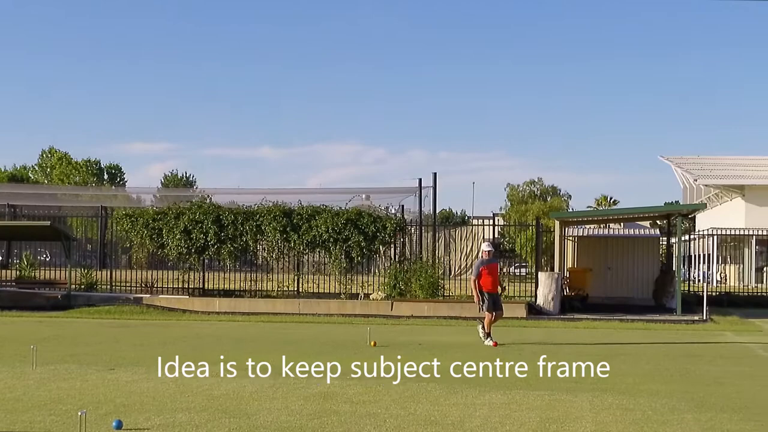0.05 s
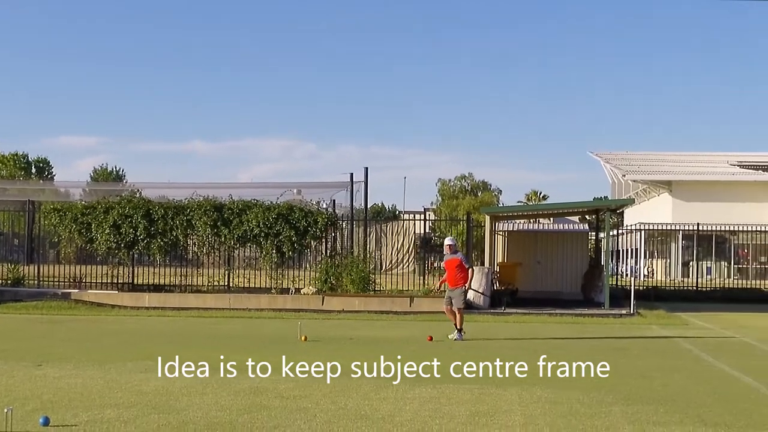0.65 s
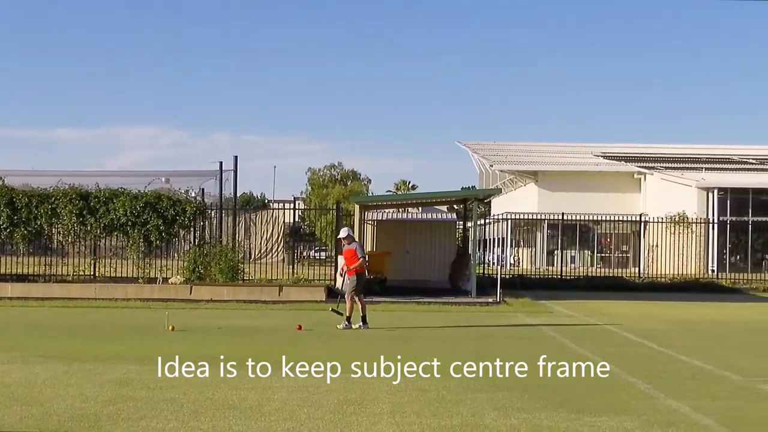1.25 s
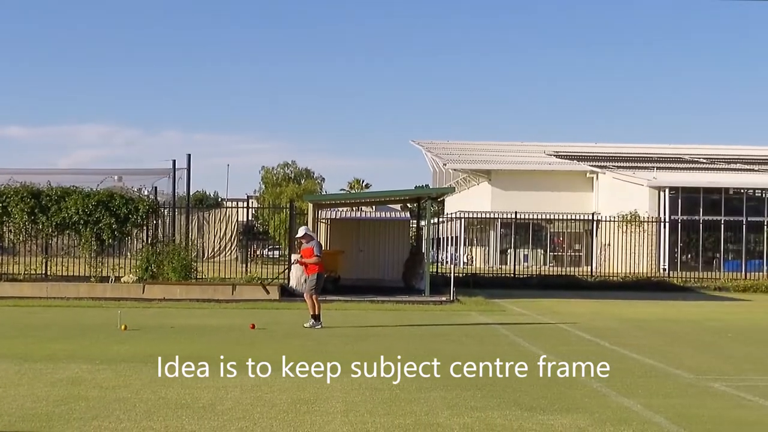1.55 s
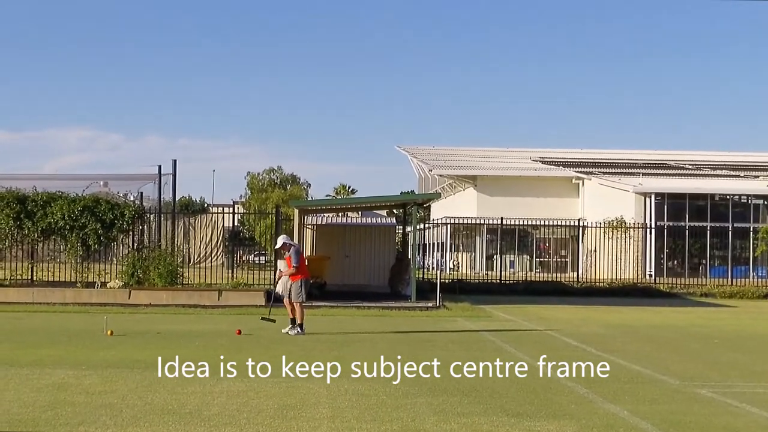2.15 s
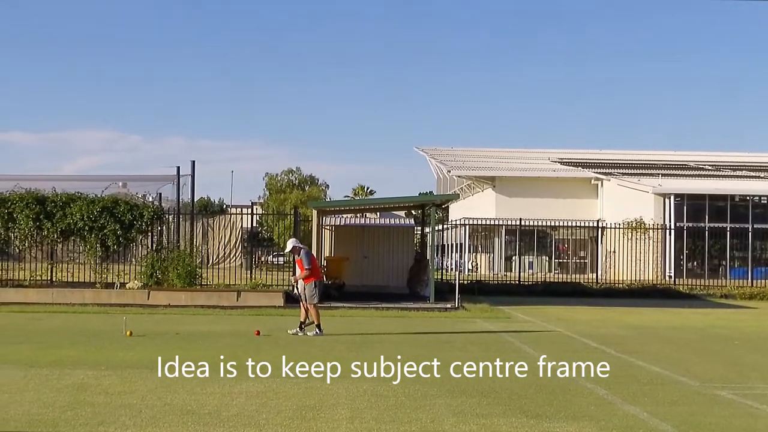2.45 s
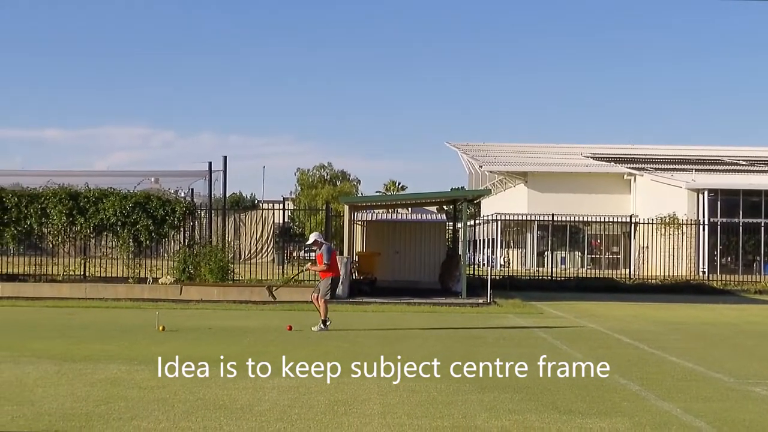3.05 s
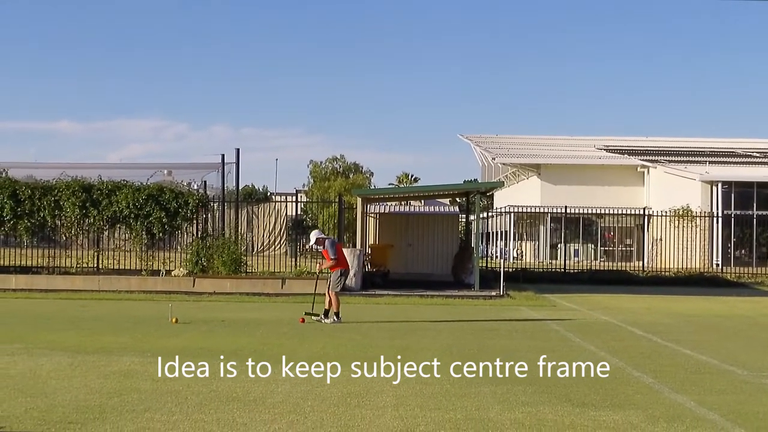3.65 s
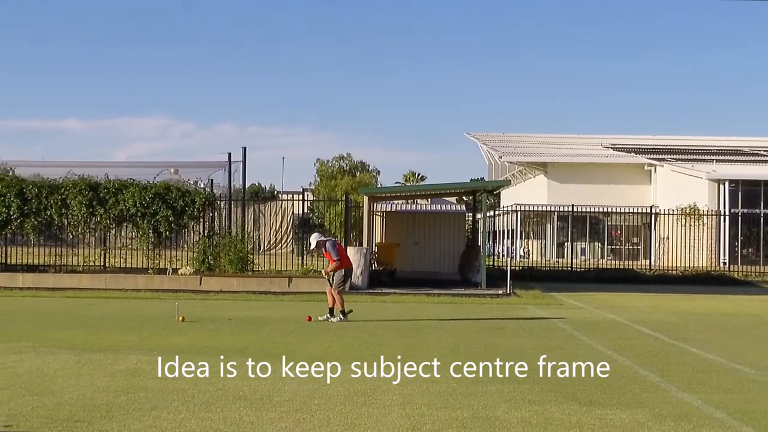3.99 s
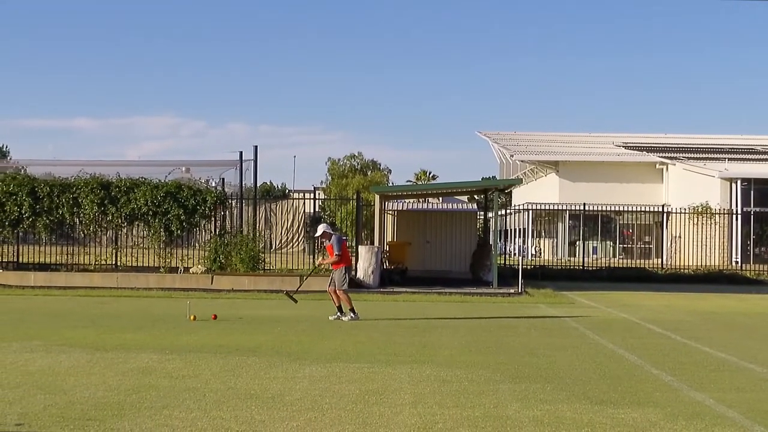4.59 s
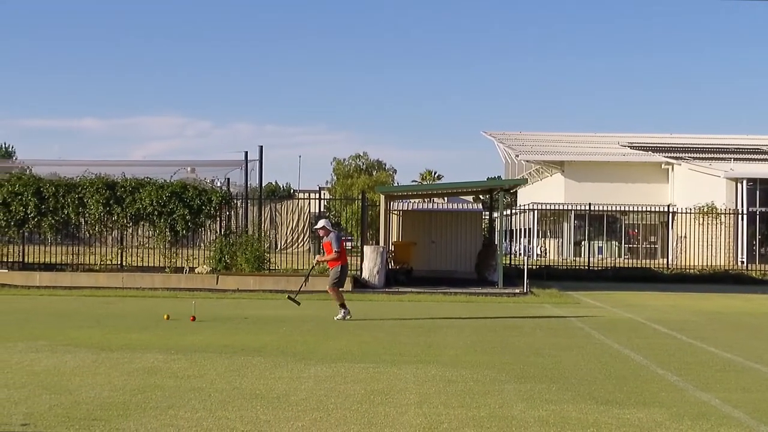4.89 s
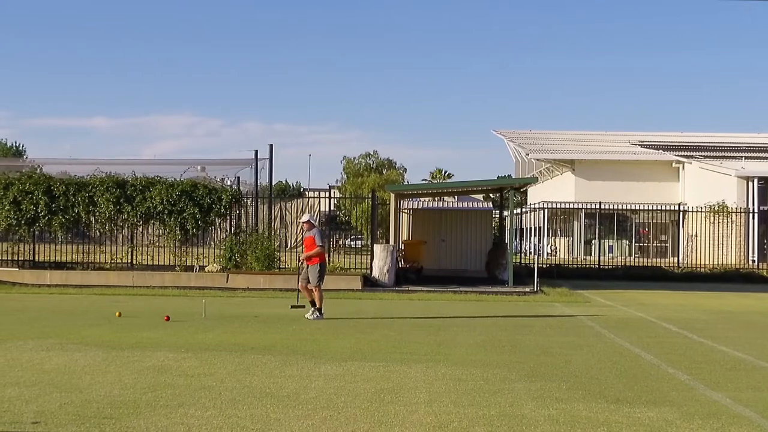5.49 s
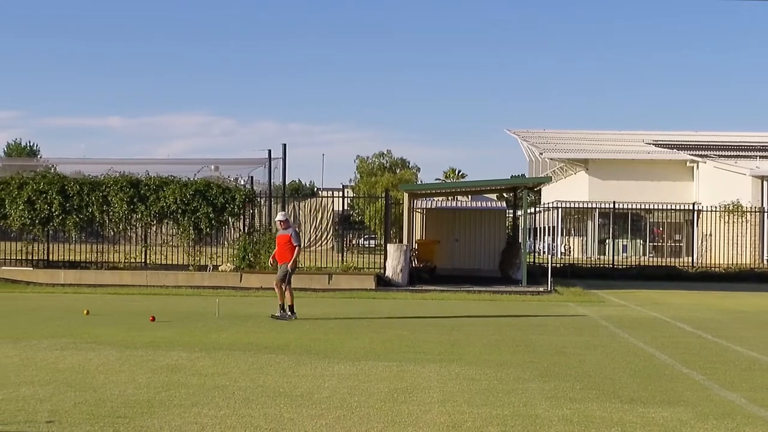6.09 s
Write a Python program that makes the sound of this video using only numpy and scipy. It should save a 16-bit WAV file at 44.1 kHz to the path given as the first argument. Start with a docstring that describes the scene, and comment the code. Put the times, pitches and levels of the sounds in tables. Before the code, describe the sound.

On an outdoor croquet lawn, uneven gusts flutter and thump at the microphone over a dull wash of far traffic and a faint mechanical hum. After about four seconds comes a single distant crack of a mallet on a ball, brief and woody, with a low knock beneath it. Stronger gusts follow, while a few tiny bird chirps stay barely audible.

```python
"""Croquet on a windy lawn

Gusts rumble at the microphone, and eddies (small whirls of air) thump against it.
Behind them lie distant traffic, a thin high hiss, a far machine's hum and whine, and a few
faint chirps and tones. Far off, a mallet strikes a ball once: a crack, a short woody ring
and a dull knock, with faint echoes from the ground and a shelter."""
import sys
import numpy as np
from scipy import signal
from scipy.fft import rfft, irfft
from scipy.io import wavfile
from scipy.ndimage import uniform_filter1d

SR = 44100
rng = np.random.default_rng(int(sys.argv[2]) if len(sys.argv) > 2 else 0)


def wrap_up_sound(samples):
    """Save the sound to the file named by the first command line argument, as 16-bit audio."""
    columns = np.atleast_2d(samples).T
    # keep every value between -1 and 1, then stretch to whole-number steps
    tamed = np.clip(columns, -1, 1)
    steps = np.round(tamed * 32767).astype(np.int16)
    wavfile.write(sys.argv[1], SR, steps)


N = 279153
T = np.arange(N) / SR
STRIKE_S = 4.2798  # when the mallet meets the ball
# the hardest thumps of the wind: t/s, level/dB, base f/Hz
BIG_EDDIES = [(0.039, -20.5, 122), (.333, -25.5, 216), (.34, -21.5, 213), (.371, -27.5, 190),
              (.406, -22.5, 176), (.471, -28.5, 130), (0.494, -28, 222), (.521, -29, 130), (.892, -25, 135),
              (1.022, -30, 168), (1.153, -28, 139), (1.407, -26, 158), (1.417, -21.5, 141),
              (1.446, -20, 235), (2.078, -28, 187), (2.146, -25.5, 173), (2.294, -25.5, 123),
              (2.822, -25.5, 258), (2.841, -26, 160), (2.855, -20, 209), (2.868, -18, 159),
              (2.883, -14.5, 244), (2.8878, -21.5, 324), (2.905, -18.5, 214), (2.913, -19, 295),
              (2.987, -20, 141), (3.0, -19.5, 196), (3.698, -24.5, 202), (3.823, -25.5, 160),
              (4.211, -31, 152), (4.332, -34.5, 160), (4.346, -34.5, 140), (4.52, -21.5, 175),
              (4.597, -26.5, 278), (5.337, -19.5, 144), (5.531, -23, 191), (5.5438, -16.5, 285),
              (5.548, -14.5, 263), (5.562, -22, 300), (5.663, -23.5, 215), (5.7, -16, 258),
              (5.714, -18.5, 164), (5.72, -20.5, 243), (5.751, -14.5, 243), (5.766, -18.5, 170),
              (5.773, -13, 200), (5.778, -23.5, 342), (5.822, -20.5, 124), (5.842, -27.5, 190),
              (6.022, -21, 109), (6.043, -21, 228), (6.065, -21, 172), (6.086, -17.5, 155)]


def undb(db):
    """Turn decibels into a number to multiply by."""
    return 10 ** (np.asarray(db) / 20)


def unit(x):
    """Scale a signal so that its average strength (rms) is 1."""
    return x / np.sqrt(np.mean(x ** 2))


def curve(points):
    """Join (time, value) points with straight lines, giving a value for every sample."""
    return np.interp(T, *np.transpose(points))


def noise(colour):
    """Noise of strength 1. Its colour says how strong each pitch is: f/Hz, relative level/dB."""
    hz, db = np.transpose(colour)
    f = np.maximum(np.fft.rfftfreq(N, 1 / SR), 1)
    gain = undb(np.interp(np.log(f), np.log(hz), db))
    return unit(irfft(rfft(rng.standard_normal(N)) * gain, N))


def wander(rate):
    """A smooth random drift of strength 1 that takes `rate` steps a second."""
    size = max(int(SR / rate), 1)
    steps = np.repeat(rng.standard_normal(N // size + 1), size)
    return unit(uniform_filter1d(uniform_filter1d(steps, size), size)[:N])


def tone(hz, width_hz, waver_db=2):
    """A tone of strength 1 whose pitch and loudness waver."""
    phase = 2 * np.pi * np.cumsum(hz + width_hz / 2 * wander(2 * width_hz)) / SR
    return unit(np.sin(phase) * undb(waver_db * wander(6.5)))


def turbulence(colour, span_s):
    """Churning air: noise evened out over span_s, so that the gust can set its strength."""
    x = noise(colour)
    return x / np.sqrt(uniform_filter1d(x ** 2, int(span_s * SR)) + 1e-3)


def airflow(rise_s=0.008, fall_s=0.0099, breeze_flutter_db=-14.5):
    """The wind's level and its share of flutter, in dB: gusts rise, hold and die back to a breeze."""
    # the breeze between gusts: t/s, level/dB
    breeze = [(0, -48), (.7, -44.5), (1.6, -45), (2, -45), (2.5, -44), (3.1, -45.5), (3.3, -46), (4, -46.5),
              (4.3, -45), (5.15, -49.5), (5.5, -48.5), (6.33, -38.5)]
    # gusts: start t/s, length/s, level/dB, share of flutter/dB
    gusts = [(0.019, 0.042, -35, -17), (0.086, 0.17, -41, -22), (0.323, 0.1, -38.5, -4.5),
             (0.462, 0.058, -35, -13), (1.2, 0.058, -35.5, -17.5), (1.408, 0.056, -32.5, -6.5),
             (1.534, 0.039, -36.5, -10.5), (2.069, 0.044, -35.5, -19), (2.648, 0.043, -36.5, -2.5),
             (2.781, .06, -41.5, -1), (2.841, 0.17, -32.5, 0.5), (3.068, 0.022, -35, -18),
             (3.388, 0.1, -35, -5.5), (3.646, 0.078, -37, -13.5), (3.788, 0.031, -37, 4),
             (4.518, 0.14, -35, -11.5), (4.735, 0.1, -37.5, -11), (5.277, 0.075, -33.5, -4),
             (5.511, 0.07, -30, 1.5), (5.584, 0.055, -32.5, -8), (5.659, 0.055, -25.5, -9.5),
             (5.761, .028, -28.5, -12), (5.821, 0.029, -35, -9.5), (5.979, 0.11, -33, -14.5),
             (6.278, 0.027, -31, -11.5)]
    power = undb(curve(breeze)) ** 2
    flutter_power = power * undb(breeze_flutter_db) ** 2
    for start, length, db, share_db in gusts:
        outside = np.maximum(start - T, 0) / rise_s + np.maximum(T - start - length, 0) / fall_s
        gust = undb(db) ** 2 * np.exp(-2 * np.minimum(outside, 20))
        power += gust
        flutter_power += gust * undb(share_db) ** 2
    return 10 * np.log10(power), 10 * np.log10(flutter_power / power)


def cover(span_s=0.008):
    """Near 1 while a big eddy covers the microphone and sweeps the small ones aside."""
    return sum(np.exp(-np.minimum(((T - s) / span_s) ** 2, 50)) for s, _, _ in BIG_EDDIES)


def wind(gust_db, flutter_share_db, covered, dip_db=4, puff_db=2.5, patchy_db=3):
    """Gusts rumble and swirl round the microphone; some break into faster flutter."""
    # deep rumble, slow swirl and fast flutter: f/Hz, relative level/dB
    rumble_colour = [(12, -42), (25, -22.5), (40, -11), (62, -5.5), (85, 2), (130, -20.5), (1000, -110)]
    swirl_colour = [(15, -51), (40, -26), (65, -7), (100, 0), (160, -0.5), (220, -8), (320, -28.5),
                    (600, -69.5), (2000, -110)]
    flutter_colour = [(100, -27.5), (170, 2.5), (230, 0.5), (300, -5.5), (400, -19), (550, -22.5),
                      (800, -48), (2500, -110)]
    # how much deep rumble the wind carries: t/s, relative level/dB
    depth = [(0, 1), (.3, -1), (1.2, -9), (2.3, -20), (2.8, -19.5), (3.6, -14), (4.3, -25), (5.1, -26),
             (5.35, -11.5), (5.55, -12.5), (5.7, -0.5), (6.1, -1), (6.33, -7.5)]
    rumble = turbulence(rumble_colour, 0.053) * undb(gust_db + curve(depth) - 2)
    # swirl and flutter come together in short puffs
    swirl_db = gust_db - 5 - dip_db * covered + puff_db * wander(40)
    swirl = turbulence(swirl_colour, 0.051) * undb(swirl_db)
    flutter = turbulence(flutter_colour, 0.05)
    flutter *= undb(swirl_db + flutter_share_db + patchy_db * wander(60))
    return rumble + swirl + flutter


def small_eddies(gust_db, covered, per_s=24, octaves_per_db=0.14, dip_db=16, count=400):
    """Unevenly spaced eddies, harder and quicker in stronger wind. Rows: t/s, level/dB, base f/Hz."""
    time_jitter, level_jitter, pitch_jitter = rng.standard_normal((count, 3)).T
    times = (np.arange(count) + 0.3 * time_jitter) / per_s
    wind_db = np.interp(times, T, gust_db)
    db = wind_db + 2 + 2.5 * level_jitter - dip_db * np.interp(times, T, covered)
    hz = 160 * 2 ** (octaves_per_db * (wind_db + 35) + 0.34 * pitch_jitter)
    return np.column_stack([times, db, hz])[(times > 0) & (times < T[-1])]


def eddy_thumps(rows, roundness=4.28, quickness=1.05, lean=1.07, reach_s=0.03, max_count=500):
    """Each eddy crossing the microphone is one rounded swing of pressure between two dips."""
    out = np.zeros(N)
    for (s, db, hz), off_centre in zip(rows, rng.uniform(-1.14, 1, max_count)):
        near = slice(max(int((s - reach_s) * SR), 0), int((s + reach_s) * SR))
        turn = 2 * np.pi * hz * quickness * (T[near] - s)
        fade = np.cos(np.pi / 2 * (T[near] - s) / reach_s) ** 2
        # the swing weakens away from the eddy's core; passing off centre makes it lopsided
        swing = np.exp(1j * lean * off_centre) / (1 - 1j * turn / roundness) ** roundness
        out[near] += undb(db) * fade * swing.real
    return out


def traffic(boost_db=9):
    """Far roads blend into a dull wash that slowly swells."""
    # the wash: f/Hz, relative level/dB
    colour = [(20, -16), (60, 5), (120, 5.5), (250, -4.5), (450, -10), (800, -10), (1500, -14),
              (2100, -22.5), (3000, -32), (4200, -40.5), (5400, -47.5), (6800, -50), (10500, -53.5),
              (12500, -59.5), (13500, -66.5)]
    # its swell: t/s, level before the boost/dB
    swell = [(0, -60), (1.4, -59), (2.2, -59.5), (2.8, -59), (3.4, -59.5), (4.4, -58.5), (4.8, -58),
             (5.2, -59.5), (5.7, -58), (6.33, -59)]
    return noise(colour) * undb(curve(swell) + boost_db)


def high_hiss(flicker_db=0.8):
    """A faint, thin high hiss that swells and sinks."""
    # the hiss: f/Hz, relative level/dB
    colour = [(1500, -24.5), (3000, 0), (4200, 1), (5400, 0), (6800, -7.5), (10500, -12.5), (12500, -17.5),
              (13500, -24)]
    # its swell: t/s, level/dB
    swell = [(0, -82.5), (.6, -87.5), (1.1, -83), (1.6, -85.5), (2.3, -85.5), (2.55, -82.5), (2.9, -82.5),
             (3.25, -88), (3.65, -84), (3.9, -82.5), (4.2, -83.5), (4.8, -82.5), (5.2, -81), (5.35, -85),
             (6.33, -86)]
    return noise(colour) * undb(curve(swell) + flicker_db * wander(6.9))


def machine():
    """A far machine gives a low hum under a thin, wavering whine."""
    # the hum: f/Hz, width of the waver/Hz, level/dB
    hum_tones = [(72.5, 2, -52), (114.6, 12, -51.5), (625.4, 22, -71)]
    # the whine: f/Hz, width of the waver/Hz, relative level/dB
    whine_tones = [(1490, 14, -0.36), (1698, 27, -13.5), (1813, 28, -13), (2143, 22, -17), (2591, 14, -18),
                   (3140, 10, -26.5), (3850, 34, -26), (4663, 9, -31)]
    # the whine's swell: t/s, relative level/dB
    swell = [(0, -69), (.65, -67.5), (.85, -67), (1.15, -65), (1.5, -66.5), (1.75, -74), (2.15, -76),
             (2.42, -64), (2.6, -67), (2.9, -68.5), (3.15, -74), (3.3, -69), (3.7, -69.5), (3.92, -65),
             (4.15, -70), (4.48, -69), (4.62, -63.5), (4.86, -62.5), (5.05, -68), (5.25, -66), (5.65, -66),
             (5.78, -64), (6.33, -67.5)]
    hum = sum(undb(db) * tone(hz, width) for hz, width, db in hum_tones)
    whine = sum(undb(db) * tone(hz, width) for hz, width, db in whine_tones)
    return hum + whine * undb(curve(swell) - 1)


def birds(width_hz=190):
    """Birds sing short, thin notes that slide down, blurred by distance."""
    # chirps: middle t/s, length/s, f/Hz, level/dB, fall in pitch/Hz
    chirps = [(2.86, .055, 5780, -91, 201), (4.7, .05, 5750, -89.5, 250), (5.445, 0.04, 5760, -88, 400),
              (5.448, .016, 5250, -85, 200), (5.464, .018, 4650, -82, 200), (5.538, 0.021, 4800, -85, 200)]
    out = np.zeros(N)
    for middle, length, hz, db, fall_hz in chirps:
        place = np.clip(2 * (T - middle) / length, -5, 5)  # runs from -1 to 1 across the note
        out += undb(db) * np.exp(-place ** 2) * tone(hz - fall_hz * place / 2, width_hz)
    return out


def far_tones(width_hz=28):
    """Two faint tones rise out of the traffic and sink back; the second sags in pitch."""
    # tones: middle t/s, length/s, f/Hz, level/dB, fall in pitch/Hz
    notes = [(3.547, .71, 778, -68.5, 0), (5.78, 0.96, 836, -64.5, 30)]
    out = np.zeros(N)
    for middle, length, hz, db, fall_hz in notes:
        place = 2 * (T - middle) / length
        out += undb(db) * np.exp(-place ** 4) * tone(hz - fall_hz * place / 2, width_hz)
    return out


def die_away(t, t60_s):
    """A fade that drops by 60 dB every t60_s seconds."""
    return np.exp(-np.log(1000) * t / t60_s)


def mallet(gain_db=-31.7, build_s=0.002, crack_s=0.00078):
    """The hard hit cracks and sets mallet and ball ringing; nearby surfaces send the sound back."""
    # ringing tones of mallet head and ball: f/Hz, relative level/dB, time to fall by 60 dB (t60)/s
    modes = [(1060, -13.5, .012), (1190, -7.5, .012), (1320, 1, .016), (1480, -6, .012), (2550, -17, .011),
             (2950, -22.5, .009), (3780, -16, .014), (4195, -18.5, .044), (4330, -24, .025),
             (5210, -29, .014), (6240, -32.5, .012), (7500, -30.5, .011)]
    # echoes from near surfaces: delay/s, gain of the ring/dB, gain of the crack/dB
    reflections = [(.0016, -30, -1), (.0062, -15, -1), (.01, -9.5, -20)]
    t = np.arange(SR // 2) / SR
    rise = np.sin(np.pi / 2 * np.minimum(t / build_s, 1))
    ring = np.zeros(len(t))
    for hz, db, t60_s in modes:
        # low tones take longer to build up than high ones
        shape = rise ** (4000 / hz) * die_away(np.maximum(t - build_s, 0), t60_s)
        ring += undb(db) / 2 * shape * np.cos(2 * np.pi * hz * (t - build_s))
    crack_colour = [(800, -35), (2500, -3), (4000, 19), (5500, 0), (7400, 0), (9500, -16), (12500, -5)]
    crack = noise(crack_colour)[:len(t)] * np.exp(-t / crack_s) * undb(-18.5)
    hit = np.interp(T - STRIKE_S, t, ring + crack, left=0, right=0)
    for delay, ring_db, crack_db in reflections:
        echo = undb(ring_db) * ring + undb(crack_db) * crack
        hit += np.interp(T - STRIKE_S - delay, t, echo, left=0, right=0)
    # fence and hedge scatter the sound into a thin tail
    since = np.maximum(T - STRIKE_S, 0)
    tail = noise([(600, -42), (1000, -11), (1330, 7), (1600, -6), (2100, -19), (4200, -29), (9000, -59)])
    tail *= np.minimum(since / 0.0048, 1) * die_away(since, t60_s=0.1)
    return undb(gain_db) * (hit + undb(-23) * tail)


def thud(hz=150, level_db=-31, t60_s=0.051):
    """A dull, low knock under the crack as the ball is driven off the turf."""
    since = np.maximum(T - STRIKE_S, 0)
    return undb(level_db) * np.sin(2 * np.pi * hz * since) * die_away(since, t60_s)


def scene():
    """The lawn as heard from one microphone."""
    gust_db, flutter_share_db = airflow()
    covered = cover()
    gusts = wind(gust_db, flutter_share_db, covered)
    thumps = eddy_thumps([*BIG_EDDIES, *small_eddies(gust_db, covered)])
    background = traffic() + high_hiss() + machine() + far_tones() + birds()
    return (gusts + thumps + background + mallet() + thud())[None]


def record(dry, fade_s=0.00089, top_hz=13400):
    """Fade both ends very briefly and cut off the highest treble."""
    from_edge_s = np.minimum(T, T[-1] - T)
    fade = np.sin(np.pi / 2 * np.minimum(from_edge_s / fade_s, 1)) ** 2
    treble_cut = signal.ellip(8, 0.2, 70, top_hz, fs=SR, output="sos")
    return signal.sosfilt(treble_cut, dry * fade)


dry = scene()
out = record(dry)
wrap_up_sound(out)
```